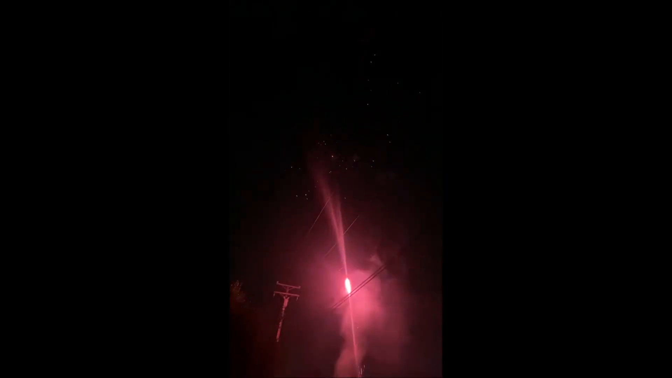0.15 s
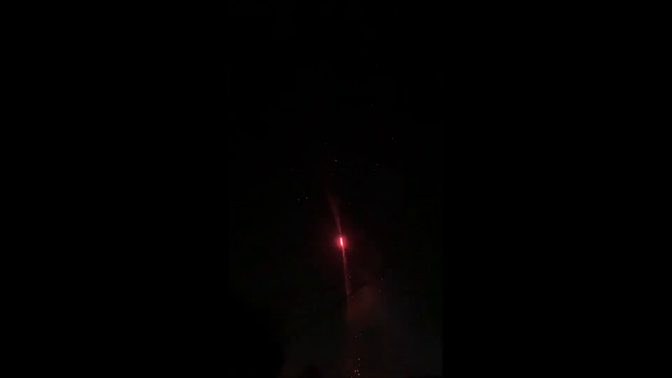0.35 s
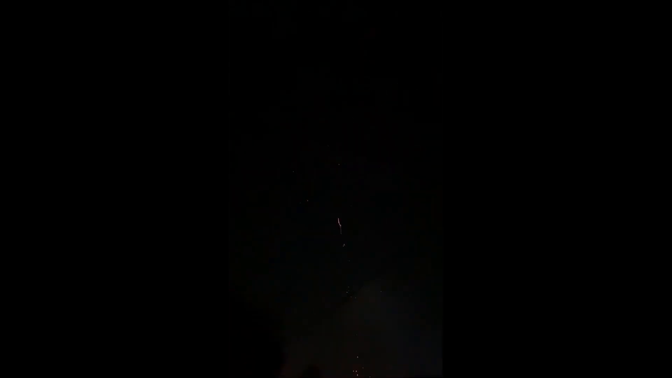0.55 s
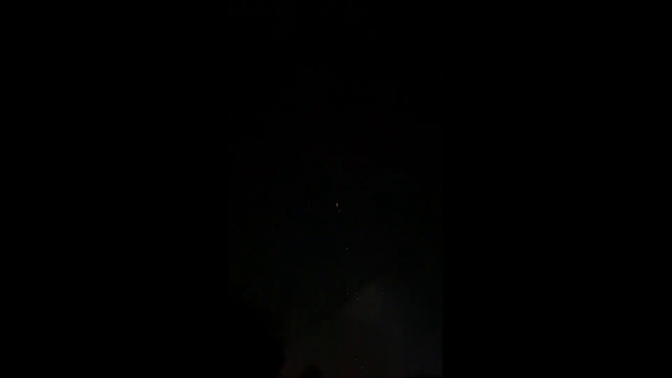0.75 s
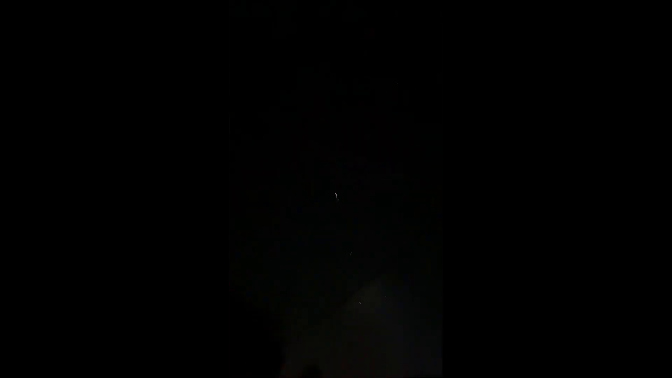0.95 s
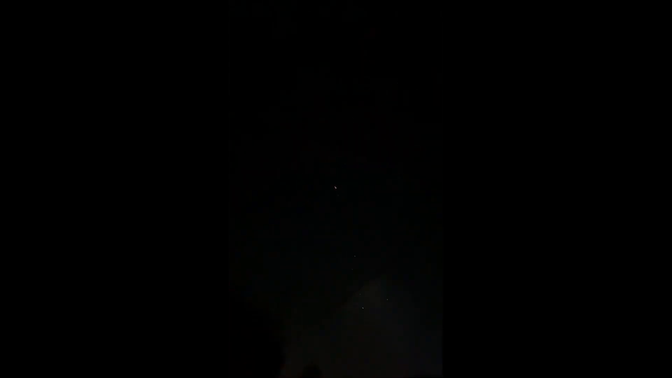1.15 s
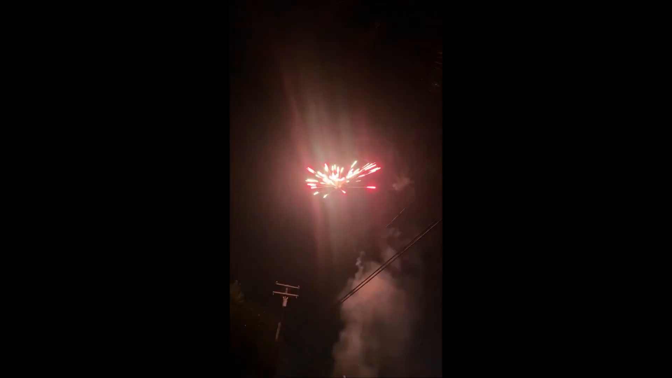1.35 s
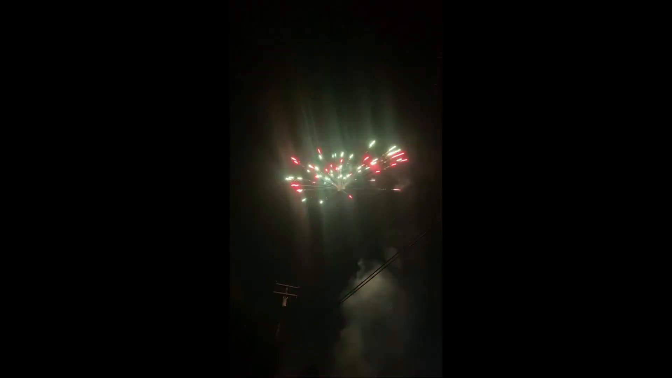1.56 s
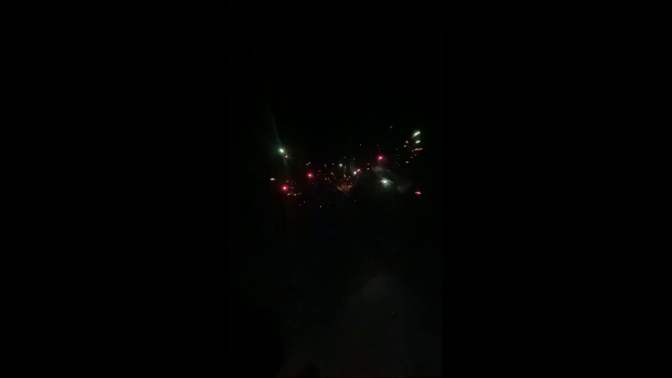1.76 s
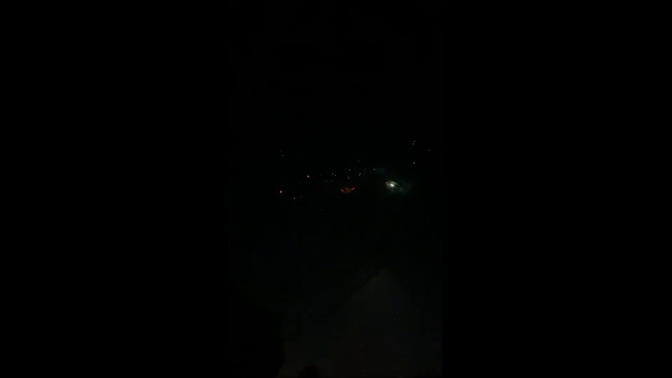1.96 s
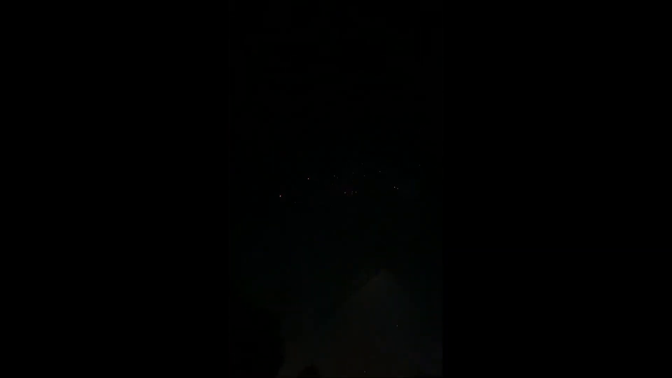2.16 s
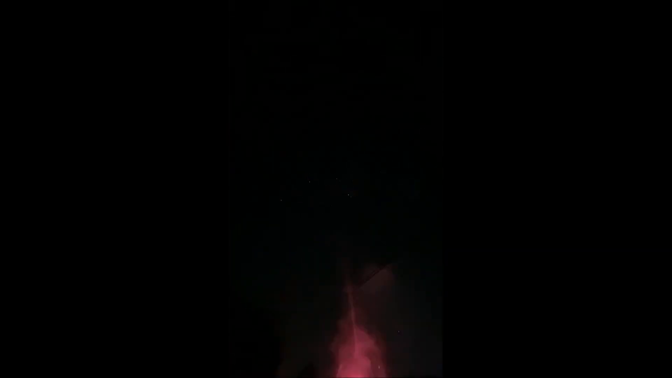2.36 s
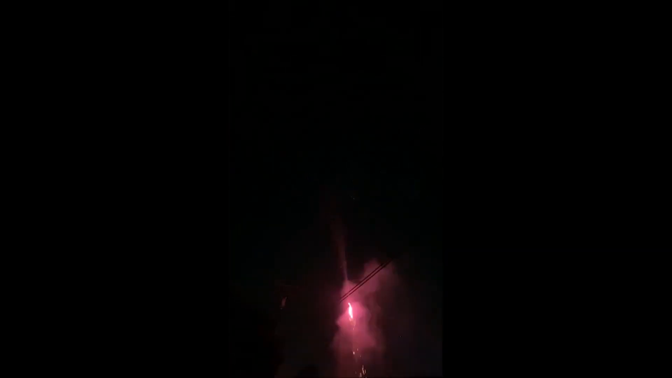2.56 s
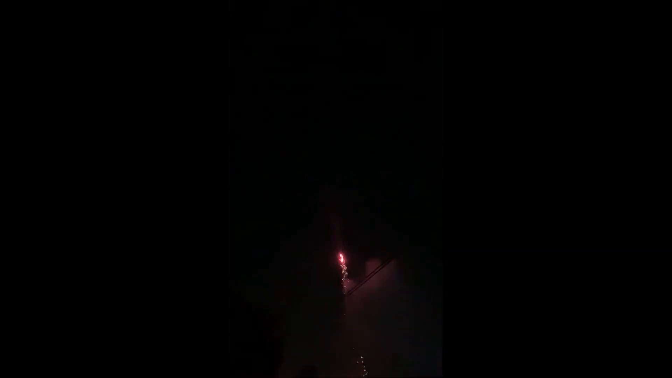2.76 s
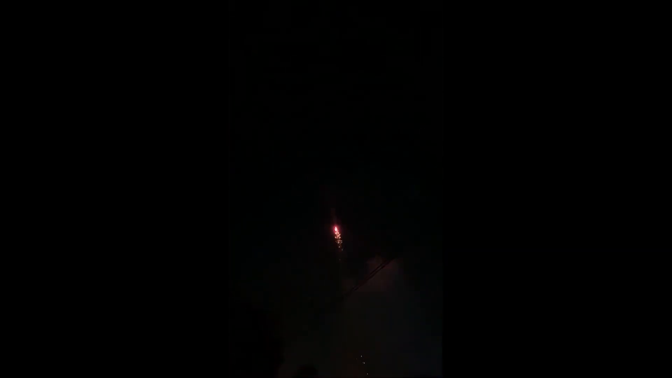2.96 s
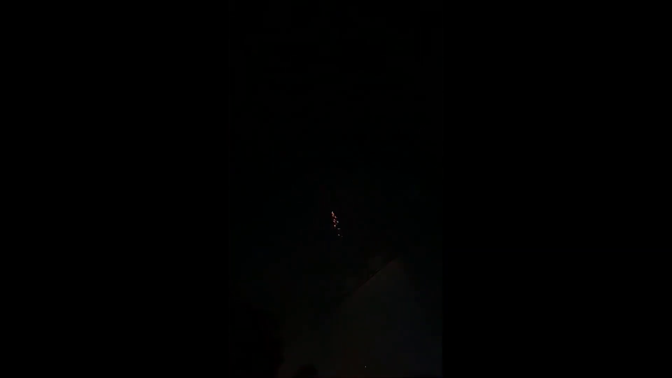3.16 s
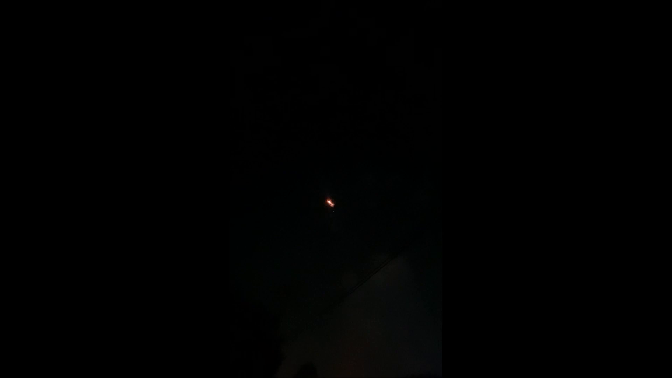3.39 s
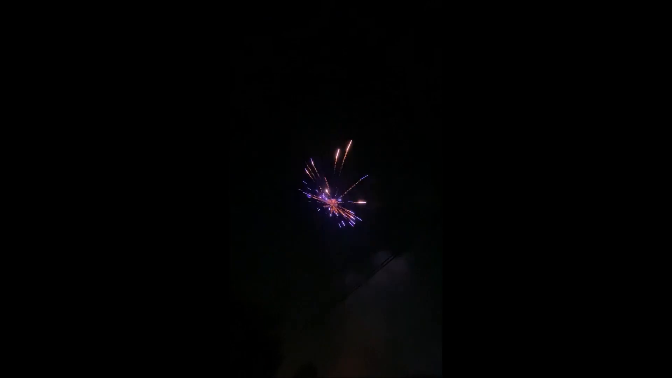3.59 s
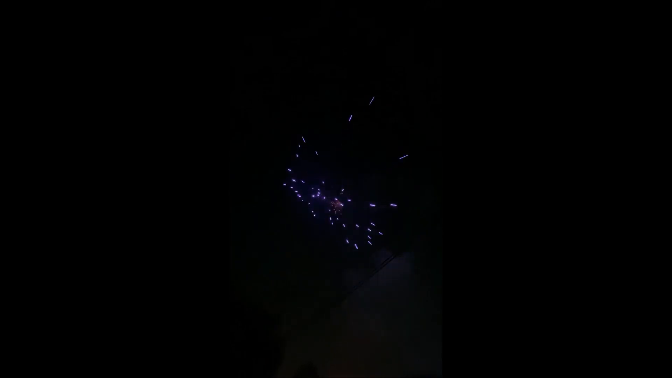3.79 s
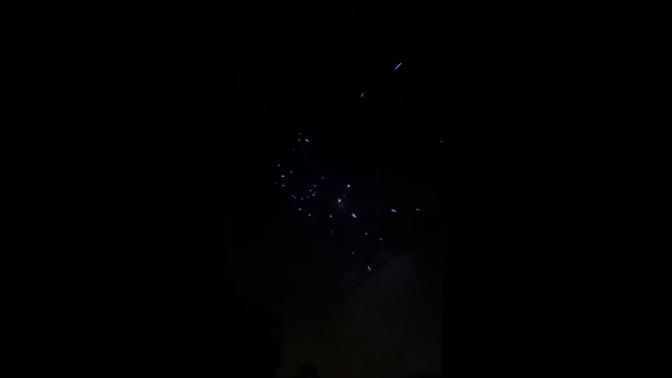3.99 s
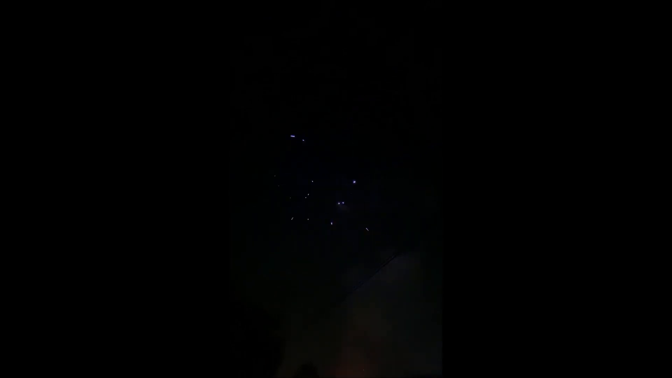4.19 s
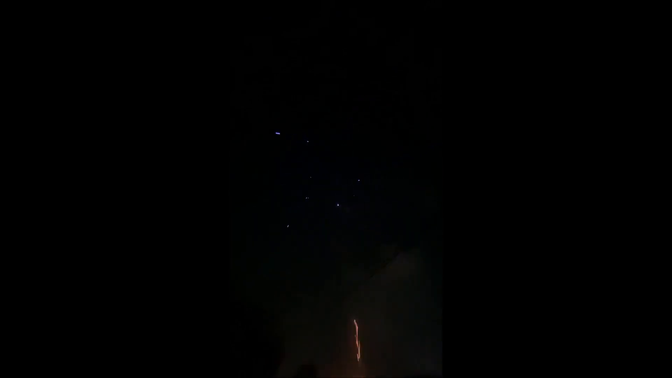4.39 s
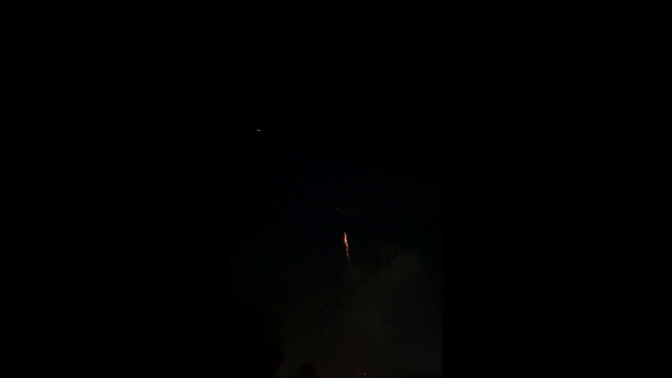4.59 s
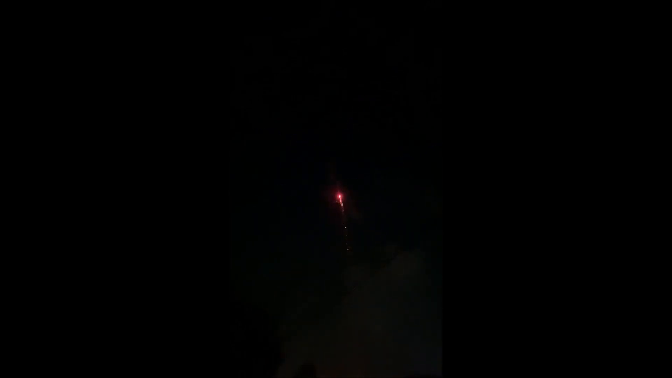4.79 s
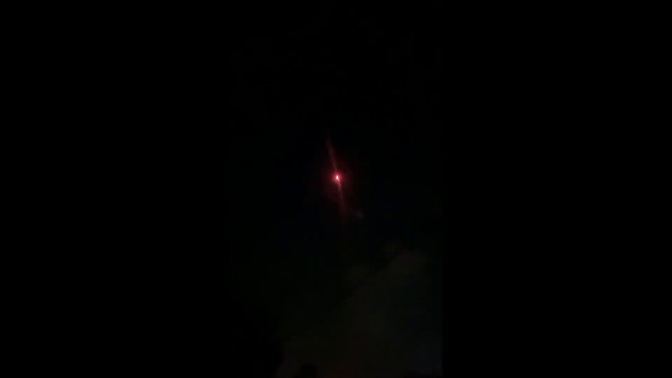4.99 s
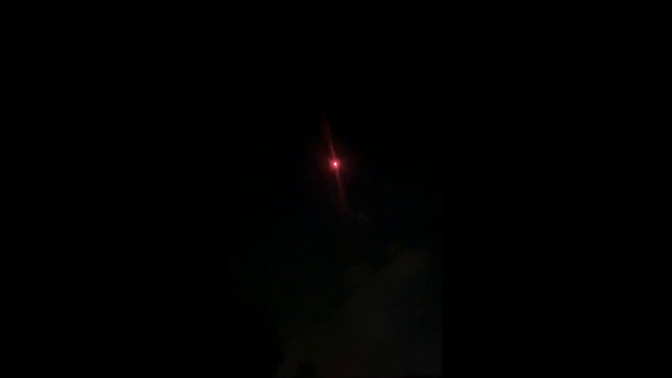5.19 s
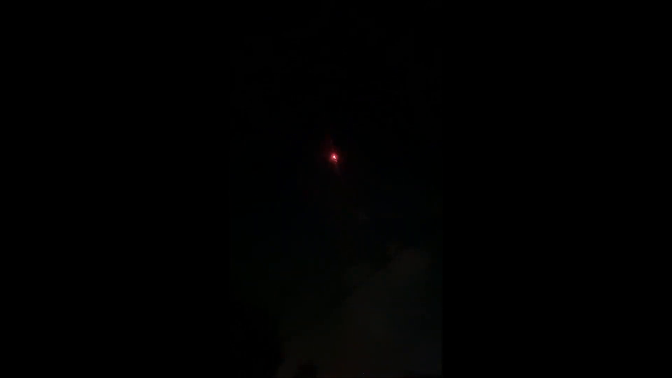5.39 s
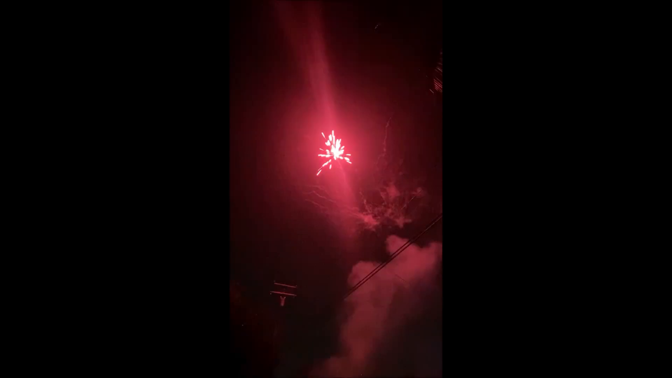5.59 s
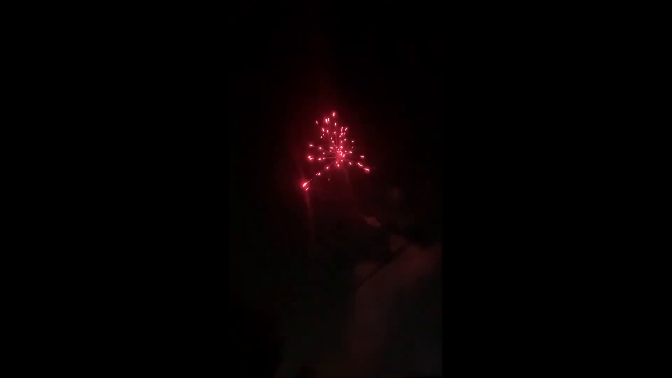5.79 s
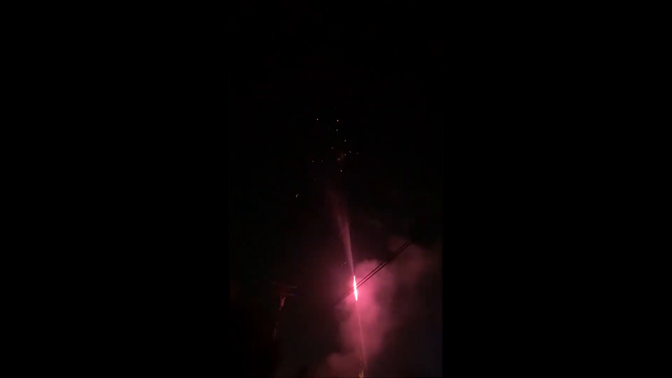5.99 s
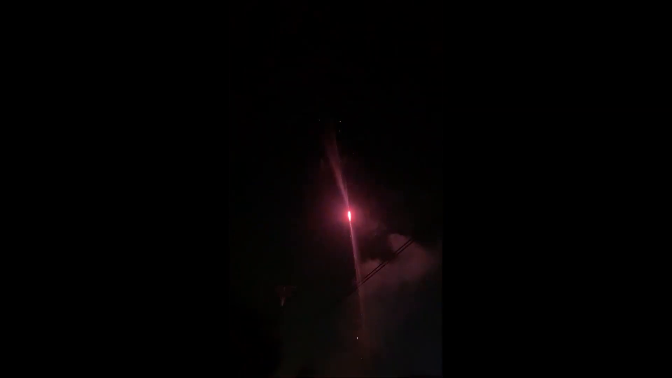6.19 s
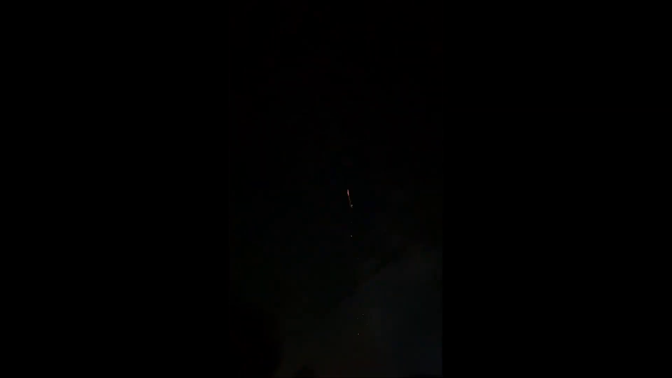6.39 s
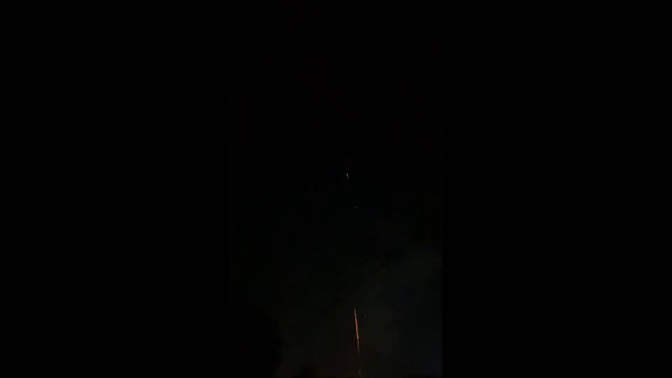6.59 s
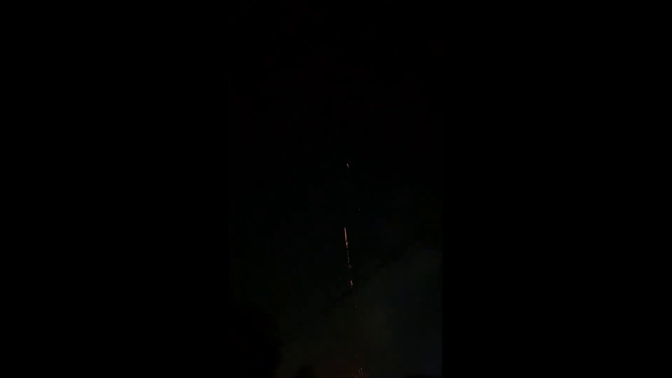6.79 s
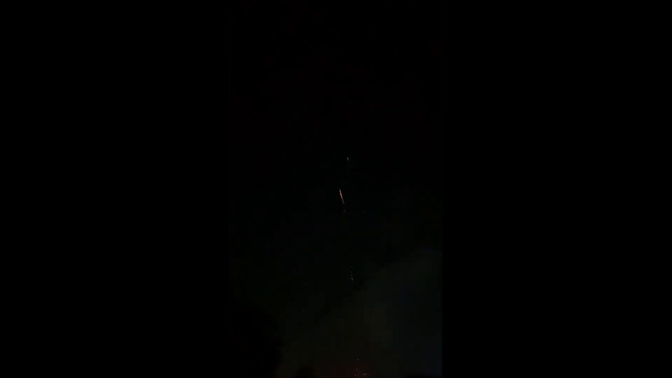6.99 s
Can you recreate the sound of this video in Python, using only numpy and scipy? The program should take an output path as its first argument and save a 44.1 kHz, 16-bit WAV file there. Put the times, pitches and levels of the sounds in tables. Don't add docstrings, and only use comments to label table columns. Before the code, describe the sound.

Outdoors at night, some way from a phone microphone, an earlier blast fades over low air and very faint crickets. A shell cracks overhead, then a launch charge thumps at the ground, and the two alternate about once a second. Each has a quick wall slap and a long diffuse echo. Distant shells thud dully between, and debris ticks lightly nearby.

```python
import sys
import numpy as np
from scipy import signal
from scipy.fft import rfft, irfft, next_fast_len
from scipy.io import wavfile
from scipy.ndimage import uniform_filter1d

SR = 44100
rng = np.random.default_rng(int(sys.argv[2]) if len(sys.argv) > 2 else 0)


def volts(x):
    e = np.asarray(x, float) / 20
    return 10 ** e


def inscribe(sig):
    pcm = np.round(np.clip(np.atleast_2d(sig).T, -1, 1) * 32767)
    wavfile.write(sys.argv[1], SR, pcm.astype(np.int16))


N = 310905
SPAN, LEAD = 16384, 2048

BURST_S = [
    1.1845,
    3.3418,
    5.4412,
    7.0338,
]
LIFT_S = [
    2.2221,
    4.1946,
    5.7661,
    6.3850,
    6.9648,
]


def axes(size=SPAN):
    return np.fft.rfftfreq(size, 1 / SR) + 1e-3, (np.arange(size) - LEAD) / SR


def band(hz, low_hz, high_hz):
    return hz ** 2 / np.sqrt((hz ** 4 + low_hz ** 4) * (1 + (hz / high_hz) ** 4))


def shaped(gain, size):
    x = irfft(rfft(rng.standard_normal((2, size))) * gain, size)
    return x / x.std()


def add(out, x, s):
    i = int(s * SR) - LEAD
    a, b = max(i, 0), min(i + x.shape[1], N)
    out[:, a:b] += x[:, a - i:b - i]


def walk(rate):
    k = int(SR / rate)
    held = np.repeat(rng.standard_normal(N // k + 1), k)
    return 1.54 * uniform_filter1d(held, k)[:N]


def ports(hz, turn, knee_hz, lag_ms=0.25):
    left_phase = 2 * np.pi * hz * lag_ms / 1000 + turn * hz / (hz + knee_hz)
    return np.exp(-1j * np.array([[1], [0]]) * left_phase)


def sweep(hz):
    return np.exp(-2j * np.pi * (1.44 * np.log((hz + 20) / 1000) + hz * LEAD / SR))


def cricket(chirps, wing_hz, width_hz, db, sharp, stroke_hz):
    t, size = np.arange(N) / SR, next_fast_len(N)
    chirp = np.cos(np.pi * np.interp(t, *np.transpose(chirps))) ** 2
    strokes = 1 + .5 * np.cos(2 * np.pi * stroke_hz * t)
    detuning = (np.fft.rfftfreq(size, 1 / SR) - wing_hz) / width_hz
    wing = shaped(1 / (1 + detuning ** 2), size)[:, :N]
    return volts(db) * chirp ** sharp * strokes * wing


def crickets():
    # time in seconds, chirps counted so far.
    lower_chirps = [(0, -2.34), (2.085, 12), (3.106, 19), (4.106, 26), (5.254, 34), (7.05, 46.5)]
    # time in seconds, chirps counted so far.
    higher_chirps = [(0, -3.5), (1.03, 5), (1.988, 13), (2.718, 19), (3.223, 23), (4.881, 36), (7.05, 53)]
    lower = cricket(lower_chirps, wing_hz=5680, width_hz=110, db=-84, sharp=3., stroke_hz=45)
    return lower + cricket(higher_chirps, wing_hz=6950, width_hz=350, db=-85, sharp=1.2, stroke_hz=65)


def tail(t, hz, decay, hold_s, wall, db, bass_db, treble_db, stretch):
    rise_s, (wall_s, wall_db, wall_t60) = 0.018, wall
    decay = np.array(decay)
    near_db, near_s, far_db, far_s = (np.interp(np.log(hz), np.log(decay[:, 0]), v) for v in decay.T[1:])

    def fade(age, t60):
        return (age > 0) * volts(-60 * np.maximum(age, 0) / max(t60, .01)) ** 2

    held = np.logaddexp(0, (t - hold_s * stretch ** 2) / .04) * .04
    near = fade(t, near_s * stretch)
    near = near + volts(wall_db) ** 2 * fade(wall_s, near_s) * fade(t - wall_s, wall_t60)
    power = volts(near_db) ** 2 * near + volts(far_db) ** 2 * fade(held, far_s * stretch)
    colour_db = db + bass_db / (1 + (hz / 200) ** 2) + treble_db / (1 + (1500 / hz) ** 2)
    return power * volts(colour_db) ** 2 * (1 - np.exp(-(np.maximum(t, 0) / rise_s) ** 4))


def echoes_at(t, hz):
    # Hz, near level in dB, near t60 in s, far level in dB, far t60 in s.
    burst_tail = [(53, -38, .25, -57, 3.), (150, -43.5, 0.19, -56.5, 2.5), (334, -37, 0.33, -49.5, 1.9),
                  (630, -33, .6, -45.5, 1.7), (1300, -39, 0.32, -54, 1.3), (2800, -48.5, 0.32, -56.5, 1.4),
                  (7400, -46, 0.31, -60.5, 0.93), (11520, -45, 0.34, -58, 0.95)]
    # Hz, near level in dB, near t60 in s, far level in dB, far t60 in s.
    lift_tail = [(53, -32.5, 0.65, -56, 3.5), (150, -32.5, .6, -54, 1.9), (330, -33.5, 0.6, -57, 3.),
                 (700, -39.5, 0.54, -63, 2.4), (1300, -38, 0.69, -62, 2.3), (2770, -42.5, 0.69, -59, 1.44),
                 (7440, -44, 0.54, -65.5, 1.3), (11500, -40.5, .55, -62, 1.1)]
    # delay in s, level in dB over the near echoes, t60 in s.
    burst_wall = (.057, -1.2, .12)
    # delay in s, level in dB over the near echoes, t60 in s.
    lift_wall = (0.073, 1.5, .12)
    # level in dB, bass in dB, treble in dB, decay stretch as a factor.
    burst_wash = [(-0.15, -2.4, -1.5, 0.96), (-0.94, 0.4, -1.4, 1.067), (2.5, -9, 1, 0.72),
                  (-3, 1.1, -1.9, 0.88)]
    # level in dB, bass in dB, treble in dB, decay stretch as a factor.
    lift_wash = [(-0.5, -1.5, -2, 0.88), (2, -0.4, -2.4, 0.9), (-2.2, 3.5, 0.5, 1.043),
                 (-4, -1, -10.5, 0.89), (-10, -1.5, -8, .97)]
    # time in s, level in dB, bass in dB, treble in dB, decay stretch as a factor.
    earlier = (-.225, -2.5, -3, -5, 1.01)
    burst_hold_s, lift_hold_s = 0.19, .03
    power = tail(t - earlier[0], hz, lift_tail, lift_hold_s, lift_wall, *earlier[1:])
    for s, row in zip(BURST_S, burst_wash):
        power = power + tail(t - s, hz, burst_tail, burst_hold_s, burst_wall, *row)
    for s, row in zip(LIFT_S, lift_wash):
        power = power + tail(t - s, hz, lift_tail, lift_hold_s, lift_wall, *row)
    return power


def wash(patchy_db=2.0, lumps_db=2.5):
    # Hz, level in dB.
    wash_colour = [(25, -21), (45, -4.5), (120, -5), (300, -6.5), (600, -5), (1000, -3.5), (1500, -6.5),
                   (3000, -2.5), (5000, -2.5), (8000, -1.5), (11500, -15), (16000, -24)]
    # Hz, density in dB per Hz.
    night = [(15, -35), (25, -5.5), (137, 4), (503, -13.5), (695, -13), (1480, -28.5), (1840, -29),
             (4740, -42.5), (5570, -42.5), (7920, -56), (16000, -42)]
    # Hz, share heard alike from 0 to 1.
    coherence = [(40, 1), (200, 0.87), (700, 0.3), (2000, 0.3), (12000, 0.13)]
    # time in seconds, level in dB.
    barrage = [(0, -46), (.25, -62), (.45, -53.5), (.62, -52), (.95, -58.5), (1.5, -55), (1.85, -63),
               (2.1, -50), (2.75, -58), (3.05, -55), (3.6, -52.5), (4.1, -59), (4.6, -58), (4.85, -55.5),
               (5.25, -54), (6.25, -60), (6.75, -52), (7.05, -65)]
    night_total_db, barrage_rest_db, barrage_top_hz = -62, -56.5, 230
    t, size = np.arange(N) / SR, next_fast_len(N)
    slow_t = t[::64]
    hz = np.fft.rfftfreq(size, 1 / SR) + 0.0012

    def on(curve, f):
        return np.interp(np.log(f), np.log(np.array(curve)[:, 0]), np.array(curve)[:, 1])

    night_db = night_total_db - 10 * np.log10(np.trapz(volts(on(night, hz)) ** 2, hz)) + 3
    lumps = volts(lumps_db * rng.standard_normal((3, size // 32 + 1))).repeat(32, axis=1)[:, :size]
    front, around, other = rfft(rng.standard_normal((3, size)) * lumps)
    alike = np.clip(on(coherence, hz), 0, 1)
    pair = np.sqrt(1 - alike) * np.array([around, other])
    pair = pair + np.sqrt(alike) * front * ports(hz, 0.5, 500)
    pair = pair * volts(on([(60, -4.5), (400, -1.0), (4000, 0.0)], hz) * np.array([[.5], [-.5]]))
    barrage_db = np.interp(slow_t, *np.transpose(barrage)) - barrage_rest_db
    out = np.zeros((2, N))
    for centre in 25 * 2 ** (np.arange(29) / 3):
        overlap = np.cos(np.clip(3 * np.log2(hz / centre), -1, 1) * np.pi / 2)
        part = irfft(pair * overlap, size)[:, :N]
        echo = np.sqrt(echoes_at(slow_t, centre)) * volts(on(wash_colour, centre))
        swell_db = barrage_db / (1 + (centre / barrage_top_hz) ** 2)
        air = volts(night_db + swell_db + on(night, centre)) * np.sqrt(.23 * centre)
        gain = np.interp(t, slow_t, np.hypot(echo, air))
        out += part / part.mean(axis=0).std() * gain * volts(patchy_db * walk(12))
    keep = band(hz, 45, SR) ** 1.5 * np.maximum(1 / np.sqrt(1 + (hz / 12300) ** 60), volts(-21))
    return irfft(rfft(out, size) * keep, size)[:, :N]


def far_shells():
    # start in seconds, peak in dB, centre in Hz.
    thuds = [(0.038, -44, 166), (0.138, -41, 191), (0.386, -51, 128), (0.478, -36, 115), (0.528, -35, 117),
             (1.468, -37, 160), (1.988, -44.5, 114), (2.201, -39, 137), (2.702, -54, 100), (2.8, -54, 240),
             (2.849, -48, 88.5), (3.086, -46, 302), (3.166, -42, 81), (4.557, -57, 124), (4.765, -45, 94.5),
             (6.188, -44, 157), (6.521, -31, 194), (6.588, -40.5, 80.7), (6.698, -42, 88), (4.583, -44, 88),
             (4.815, -44, 62), (4.93, -47, 100), (5.035, -46, 70), (.69, -51, 150), (.75, -48, 150),
             (.56, -42, 90)]
    # start in seconds, peak in dB, centre in Hz.
    thumps = [
        (1.198, -28, 54.7),
        (3.355, -29.5, 54.7),
    ]
    # start in seconds, peak in dB, centre in Hz.
    knocks = [(0.398, -43, 404), (0.534, -46, 724), (1.621, -44, 503), (1.738, -57, 398),
              (1.947, -42.5, 413), (2.043, -32.5, 383), (2.114, -43.5, 595), (2.192, -46.5, 301),
              (3.918, -41, 540), (5.203, -45, 324), (5.318, -44.5, 333), (6.322, -43.5, 990)]
    out, (hz, _) = np.zeros((2, N)), axes()
    for s, db, centre_hz in thuds + thumps + knocks:
        colour = band(hz, 0.93 * centre_hz, 1.1 * centre_hz) ** 1.9
        thud = irfft(sweep(hz) * colour * ports(hz, 0.27, 200))
        add(out, volts(db) * volts([[-1], [1]]) * thud / np.abs(thud).max(), s - .3 / centre_hz)
    return out


def debris():
    # start in seconds, peak in dB, low cut in Hz, high cut in Hz, t60 in seconds.
    ticks = [(0.4826, -55, 1000, 4000, .03), (2.042, -53.5, 1200, 4960, 0.082),
             (3.2486, -56, 1495, 3000, .04), (4.62, -55, 1490, 8000, 0.021), (6.1, -44, 3020, 9150, .03),
             (6.158, -26, 1020, 1980, 0.016), (6.158, -36, 4740, 8300, 0.019),
             (6.2353, -44, 6100, 13800, 0.026), (6.35, -42.5, 4500, 12000, 0.42),
             (6.6825, -41, 880, 2820, 0.035), (6.708, -43, 1475, 9990, 0.019),
             (6.735, -51, 1520, 8100, 0.023), (6.768, -52, 1520, 8000, .015),
             (6.8814, -53, 4000, 9000, 0.027), (6.91, -55, 3000, 8220, 0.026)]
    out, (hz, t) = np.zeros((2, N)), axes()
    for s, db, low_hz, high_hz, t60 in ticks:
        ring = (t > 0) * np.exp(-np.log(1000) * abs(t) / max(t60, .003))
        colour = band(hz, low_hz, high_hz) ** 2
        tick = irfft(rfft(ring * shaped(colour, SPAN)) * colour)
        add(out, volts(db) * tick / np.abs(tick).max(), s)
    return out


def rustles():
    rustle_s = (.808, 2.805, 6.688, 6.815, .4, 2.04, 5.21, 6.33, 3.95, .86)
    # length in seconds, level in dB, low cut in Hz, high cut in Hz.
    rustle_shapes = [(0.037, -63, 1100, 3400), (.025, -73, 5000, 10000), (0.04, -60, 400, 6500),
                     (.035, -68.5, 1000, 5700), (0.14, -65.5, 300, 890), (0.054, -62.5, 400, 1700),
                     (0.11, -63.5, 320, 650), (.04, -64, 700, 3000), (.12, -80.5, 1500, 5400),
                     (0.14, -79, 3000, 3700)]
    out, (hz, t) = np.zeros((2, N)), axes()
    for s, (length, db, low_hz, high_hz) in zip(rustle_s, rustle_shapes):
        swell = np.exp(-((t - .1) / (length * np.where(t < .1, .35, 1.4))) ** 2)
        add(out, volts(db) * swell * shaped(band(hz, low_hz, high_hz), SPAN), s - .1)
    return out


def blast(pulse_db, crackle_db, early_db, top_hz, turn, echoes, hum, corner_hz, knee_hz, crackle_s,
          length_s, ring_hz):
    hz, t = axes()
    pulse = sweep(hz) * band(hz, 30, top_hz) / np.sqrt(1 + (hz / corner_hz) ** 2)
    pulse = irfft(pulse) * np.exp(-(t / length_s) ** 4)
    pulse = rfft(volts(pulse_db) * pulse / np.abs(pulse).max())
    uneven = volts(4. * rng.standard_normal(SPAN // 256 + 1)).repeat(128)[:len(hz)]
    resonance = 1.8 / (1 + ((hz - ring_hz) / 300) ** 2)
    burn = 0.81 * np.exp(-abs(t) / 0.0024) + 0.35 * np.exp(-abs(t) / crackle_s)
    burn = np.where(t < 0, np.exp(t / 0.001), burn)
    gas = shaped(uneven * (band(hz, 1400, 12000) + resonance), SPAN) * burn
    early = shaped(band(hz, 280, 800), SPAN) * (t < .001) * np.exp(-(t / 0.011) ** 4) * volts([[-8], [0]])
    source = pulse * ports(hz, turn, knee_hz) + volts(crackle_db) * rfft(gas)
    paths = 0
    for ms, left_db, right_db, low_hz, high_hz in echoes:
        delay = np.exp(-2j * np.pi * hz * ms / 1000)
        paths = paths + volts([[left_db], [right_db]]) * band(hz, low_hz, high_hz) * delay
    hum_hz, glide, peak_s, spread_s, hum_db = hum
    drone = (t > 0) * np.sin(2 * np.pi * (hum_hz + glide * t / 2) * t) * np.exp(-((t - peak_s) / spread_s) ** 2)
    drone = volts(pulse_db + hum_db + np.array([[-2.5], [0]])) * drone
    return irfft(source * paths) + volts(early_db) * early + drone


def rack():
    # pulse in dB, crackle in dB, lead-in noise in dB, pulse top in Hz, left phase turn in rad.
    bursts = [(-11.5, -25, -21, 6000, 0.31), (-12, -23, -17.5, 10000, 0.65),
              (-10, -20.5, -33.5, 2300, 2.35), (-11, -21.5, -21, 2200, 1.35)]
    # pulse in dB, crackle in dB, lead-in noise in dB, pulse top in Hz, left phase turn in rad.
    lifts = [(-9.5, -18.5, -37.5, 2000, 1.9), (-10, -17, -24.5, 1000, 1.7), (-11.5, -15, -36.5, 2000, 1.5),
             (-13, -26, -32, 460, 0.99), (-21, -29.5, -34, 670, 1.55)]
    # delay in ms, left in dB, right in dB, low cut in Hz, high cut in Hz.
    burst_echo = [(0, -9, 3, 54, 8500), (9.7, -1, -17.5, 250, 9700), (59, -16, -4, 880, 1500)]
    # delay in ms, left in dB, right in dB, low cut in Hz, high cut in Hz.
    lift_echo = [(0, -1, 2, 200, 10000), (1.52, -2, -1, 32, 120), (7.18, -3, -7.5, 86, 1600),
                 (12.9, -6, -7, 55, 140), (19.06, -14, -13.5, 60, 880), (62.96, -9, -7, 140, 3400),
                 (71.65, -18.5, -18.5, 110, 900), (138.3, -21, -21, 36, 420)]
    # start in Hz, glide in Hz per s, peak time in s, spread in s, level in dB under the pulse.
    burst_hum = (48, 0, .16, .08, -34)
    # start in Hz, glide in Hz per s, peak time in s, spread in s, level in dB under the pulse.
    lift_hum = (60, 110, .05, .13, -22)
    out = np.zeros((2, N))
    for s, shape in zip(BURST_S, bursts):
        add(out, blast(*shape, burst_echo, burst_hum, corner_hz=140, knee_hz=40, crackle_s=0.017,
                       length_s=.017, ring_hz=2280), s)
    for s, shape in zip(LIFT_S, lifts):
        add(out, blast(*shape, lift_echo, lift_hum, corner_hz=200, knee_hz=250, crackle_s=0.023,
                       length_s=0.024, ring_hz=3680), s)
    return out


def sizzle(grain_db=3.0):
    stars = (7, 1, -68, 700, 7000)
    s, length, db, low_hz, high_hz = stars
    size = SPAN * 2
    hz, t = axes(size)
    pops = rng.standard_normal((2, size)) * volts(grain_db * rng.exponential(size=size))
    pops = irfft(rfft(pops) * band(hz, low_hz, high_hz) ** 2)
    swell = np.sin(np.pi * np.clip(t / length, 0, 1)) ** .5
    out = np.zeros((2, N))
    add(out, volts(db) * pops / pops.std() * swell, s)
    return out


def scene():
    return crickets() + wash() + far_shells() + debris() + rustles() + rack() + sizzle()


def roll_off(x):
    return signal.sosfilt(signal.butter(12, 16480, fs=SR, output="sos"), x)


def record(dry):
    dull = signal.sosfilt(signal.butter(6, 14500, fs=SR, output="sos"), dry)
    return roll_off(np.tanh(1.166 * dull) / 1.224)


dry = scene()
out = record(dry)
inscribe(out)
```